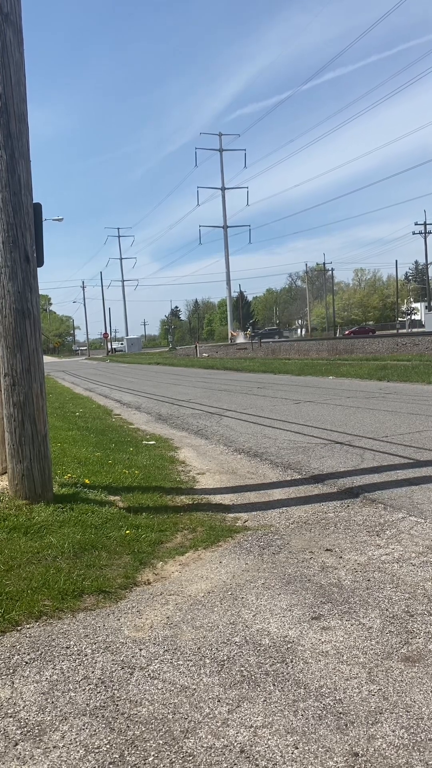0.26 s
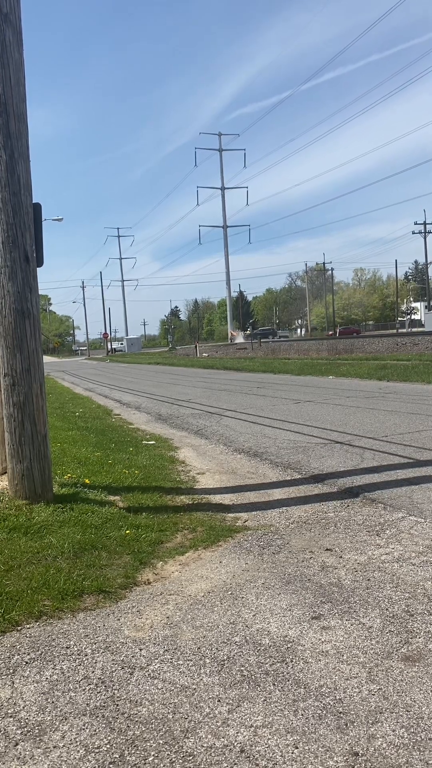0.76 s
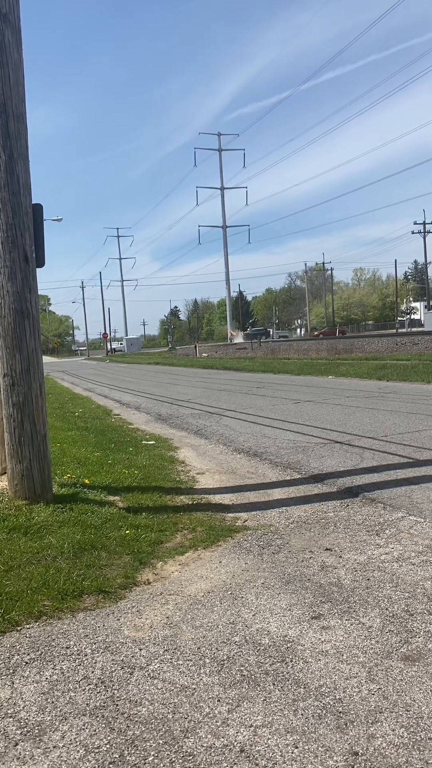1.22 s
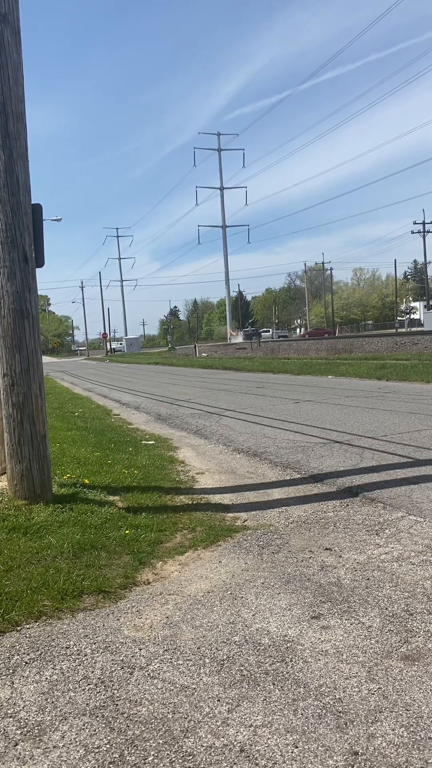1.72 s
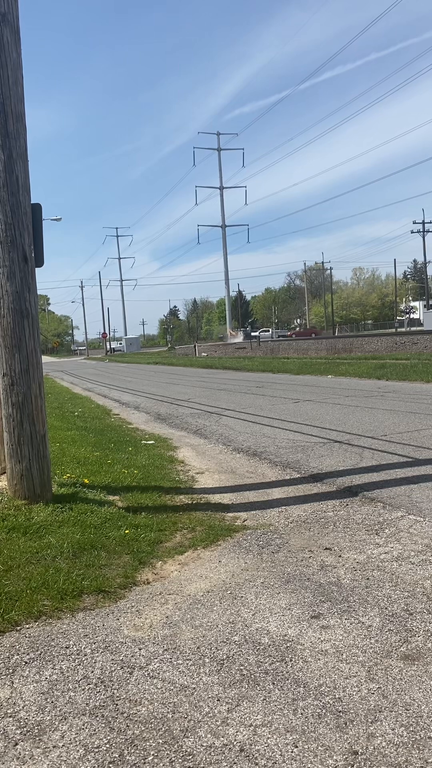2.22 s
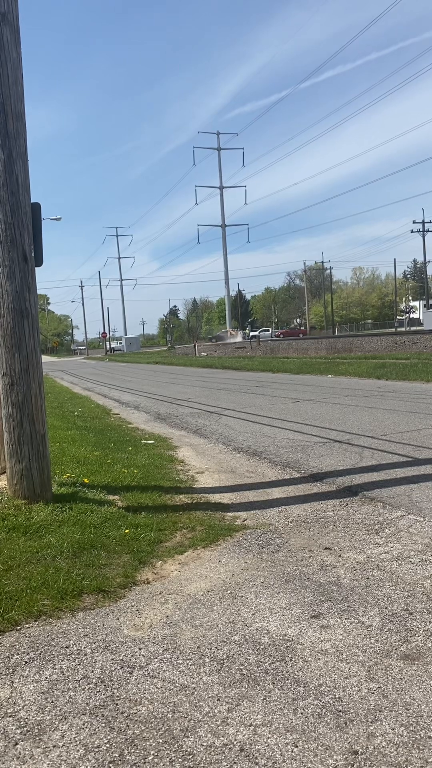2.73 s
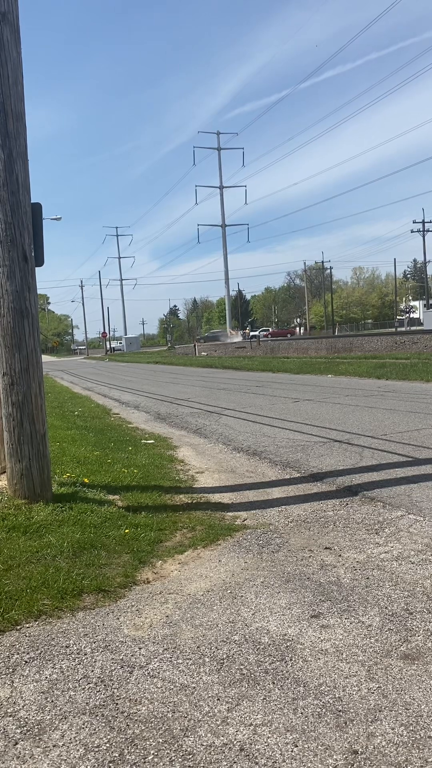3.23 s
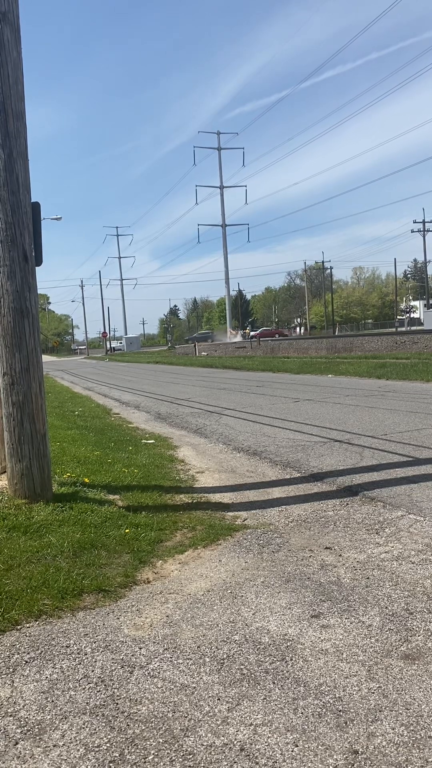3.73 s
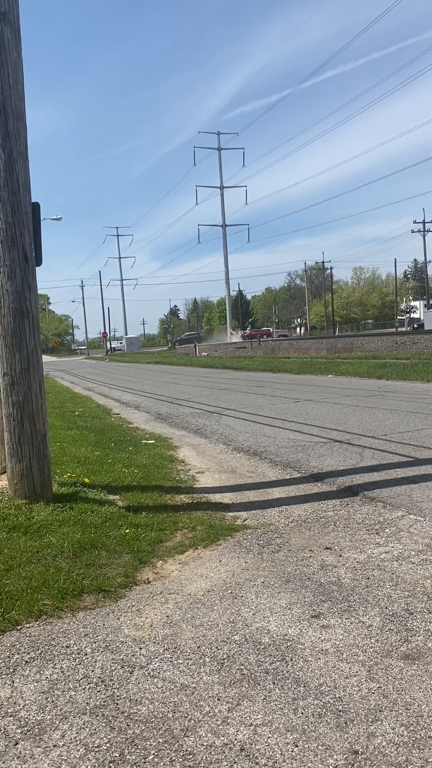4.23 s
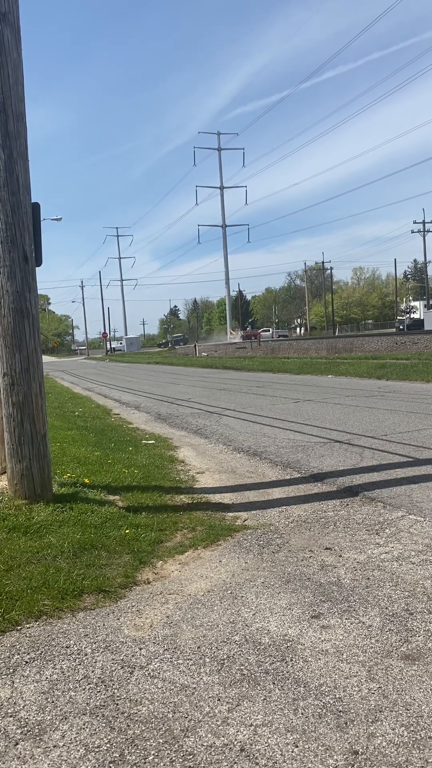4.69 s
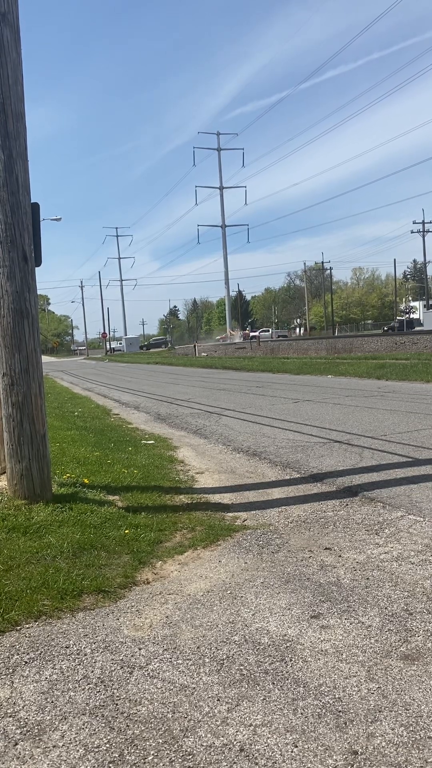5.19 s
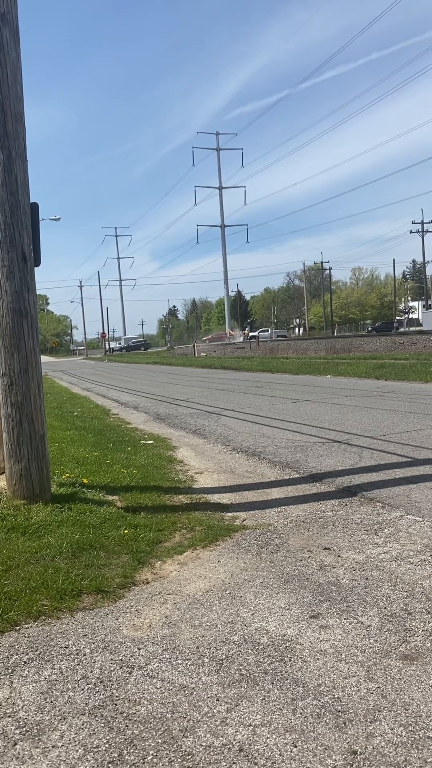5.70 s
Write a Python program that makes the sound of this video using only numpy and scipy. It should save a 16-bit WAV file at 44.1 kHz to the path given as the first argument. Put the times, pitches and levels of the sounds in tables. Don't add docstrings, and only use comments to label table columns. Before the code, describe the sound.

Across a wide open road, a heavy rail machine drones in the mid-lows while stones scrape, tumble and ring its steel plates in uneven beats. Around four seconds it dies down to a soft idling engine and distant traffic, a faint whine rises, then the work abruptly restarts. Light wind rumbles and slaps at a handheld stereo phone throughout.

```python
import sys
import numpy as np
from scipy import signal
from scipy.fft import rfft, irfft
from scipy.io import wavfile
from scipy.ndimage import uniform_filter1d

SR = 44100
rng = np.random.default_rng(int(sys.argv[2]) if len(sys.argv) > 2 else 0)


def gain_from_db(level_db):
    decades = np.asarray(level_db, float) / 20
    return 10 ** decades


def store_wav(level_fs):
    pcm = np.round(np.clip(np.atleast_2d(level_fs), -1, 1) * 32767)
    wavfile.write(sys.argv[1], SR, pcm.T.astype(np.int16))


N = 262395
T, HZ = np.arange(N) / SR, np.arange(N // 2 + 1) * SR / N

# pitch in Hz, width in Hz, level in dB.
DRONE_BANDS = [(344, 10.4, 5), (315.7, 22.6, -5), (450.2, 38, -12), (405, 17, -11.5), (257, 39, -11)]
# pitch in Hz, width in Hz, level in dB.
FRAME_BANDS = [(637.2, 37, 3.5), (947, 22.6, 1), (1053, 81, -2), (1311, 48, -3), (1196, 53, -3),
               (760, 340, -6), (1492, 104, -6.5), (540, 89, -8.5)]
# pitch in Hz, width in Hz, level in dB.
PLATE_BANDS = [(1685, 46, -4), (1839, 55, -2), (2119, 31, -0.5), (2017, 140, -4), (2272, 103, -3),
               (2407, 112, -3), (2656, 92, -13)]
# pitch in Hz, width in Hz, level in dB.
LOOSE_BANDS = [(3130, 70, -9), (3780, 33, -15), (4300, 46, -9.5), (4650, 65, -8.5), (4720, 50, -19)]
# pitch in Hz, width in Hz, level in dB.
IDLE_BANDS = [(179, 19.5, 5), (153, 8.6, -10), (241, 31, -19), (300, 17, -28), (495, 47, -14.5),
              (5800, 350, -36.5)]
# frequency in Hz, strength in dB per Hz.
STONE_COLOUR = [(2300, -20), (2850, -1), (3200, 1), (3700, -2.5), (4350, -4), (4850, 0), (5350, -8),
                (5900, -8.5), (6500, -10.5), (7500, -6), (8500, -21.5), (9500, -30), (11500, -31.5),
                (12800, -44), (13800, -51.5), (14800, -69)]
# frequency in Hz, strength in dB per Hz.
TRAFFIC_COLOUR = [(200, -35.5), (320, -6), (500, -15), (650, -11.5), (1000, -15.5), (2300, -19),
                  (2900, -27), (5800, -35), (6500, -49), (8000, -48), (9000, -62), (12000, -66.5),
                  (13500, -71), (14500, -90)]
# frequency in Hz, strength in dB per Hz.
SPILL_COLOUR = [(2000, -24.5), (4000, 3), (6500, 5), (7700, 13), (9000, -10.5), (11500, -15.5),
                (13500, -26), (15500, -36.5)]
# frequency in Hz, strength in dB per Hz.
DEEP_COLOUR = [(15, -39.5), (30, -19.5), (45, -5.5), (60, 1.5), (95, 2), (125, -17), (200, -55.5)]
# frequency in Hz, strength in dB per Hz.
FLUTTER_COLOUR = [(60, -39), (100, -12.5), (135, 2.5), (170, -9), (250, -9.5), (300, -15.5), (450, -48)]
# frequency in Hz, strength in dB per Hz.
CROSS_LOW_COLOUR = [(15, -37.5), (35, -16.5), (70, -3.5), (140, 2.5), (250, -4.5), (350, -20), (600, -41)]
# frequency in Hz, strength in dB per Hz.
CROSS_RASP_COLOUR = [(150, -34.5), (280, 4.5), (400, -0.5), (700, -11), (1000, -19), (1400, -30),
                     (2000, -54)]
# frequency in Hz, left lead in radians, left minus right in dB,
# share from all round in dB.
PORT_DIFFERENCE = [(300, -.1, -.6, -20), (800, -.12, -.5, -20), (1250, -.05, 0, -29), (1900, 0, .2, -34),
                   (2200, .1, 3.5, -10), (2600, -.3, 3, -6), (2950, -1.4, -1, -3), (3400, -1.6, -7, -1),
                   (4050, .6, -7, 0), (4800, -2, -3, -4), (5350, 0, 0, -20), (5800, 1, 0, -8),
                   (6300, 2.1, 0, -12), (6950, 3.05, 0, -24), (7950, 3.25, 0, -21), (8800, 4.7, 0, -10),
                   (9500, 6.25, 0, -24), (11200, 6.3, 0, -26), (11900, 7.2, 0, -12), (12500, 9.3, 0, -22),
                   (15000, 9.5, 0, -20)]
# start in seconds, peak in dB, pitch in Hz, left minus right in dB.
SLAPS = [(1.126, -8.5, 145, 5), (1.3005, -8.5, 97, 4), (1.54, -16, 89, 2), (1.528, -10.5, 226, 0),
         (1.616, -27, 160, -6), (2.57, -12, 230, -2), (0.56, -17, 260, 0), (2.366, -10.5, 200, -1),
         (1.348, -15, 140, 3), (1.405, -24, 110, 2), (3.4, -23, 130, -0.5), (4.463, -30, 63, 25),
         (5.3, -17, 63, -4)]
# start in seconds, peak
# in dB, pitch in Hz, ring time (60 dB) in seconds.
KNOCKS = [(.36, -32, 1340, 0.1), (1.628, -18.5, 278, .09), (1.675, -24, 231, .12), (1.74, -26, 201, 0.11),
          (2.2763, -19, 290.4, .06), (2.3015, -19, 290.6, 0.051), (2.33, -16, 340, 0.037),
          (2.3462, -15, 300, 0.045), (2.359, -12, 488.6, 0.024), (2.363, -26, 760, 0.061),
          (2.799, -32, 1256, 0.29), (3.09, -27, 1242, 0.15), (3.421, -28, 1081, 0.13),
          (3.869, -30, 626.5, 0.19), (5.422, -24, 1047, 0.098)]
# start in seconds, peak in dB, pitch in Hz, ring time (60 dB) in seconds.
TICK = (2.629, -27, 4400, .018)
# start in seconds, peak in dB.
SPILLS = [(0.377, -59), (1.031, -59.5), (1.189, -58), (1.3843, -60), (.52, -58.5), (1.7774, -70),
          (2.04, -62), (2.215, -63), (2.3776, -50.5), (2.5287, -68), (3.474, -54), (5.3936, -68.5),
          (5.7379, -64), (2.9777, -53), (3.144, -50), (3.307, -54), (3.3882, -48), (3.711, -56.5),
          (4.4702, -72), (5.4968, -60.5), (5.662, -55)]
# middle in seconds, length in seconds,
# depth from 0 to 1, low edge in Hz, high edge in Hz.
GUARD_DIPS = [(1.089, 0.024, 0.79, 250, 700), (2.412, 0.026, 0.69, 60, 700), (1.173, .02, 0.8, 170, 260),
              (1.27, .07, 0.53, 480, 620), (2.51, 0.016, 1, 414, 1120), (3.97, 0.0081, 0.5, 250, 600),
              (4.386, 0.031, 0.65, 230, 604), (4.45, 0.0086, 1, 101, 900), (4.605, 0.018, 0.44, 230, 600),
              (5.003, 0.031, 0.85, 60.3, 706), (5.106, 0.0091, 0.3, 60, 300)]
# time in seconds, level on the plates in dB.
FEED = [(0, -43), (.45, -41), (1.1, -44.5), (1.55, -46), (2.3, -47.5), (2.55, -46.5), (2.75, -39),
        (3.1, -37), (3.6, -37), (3.76, -45.5), (3.9, -48), (5.15, -36.5), (5.3, -40), (5.5, -38),
        (5.62, -41.5), (5.75, -40), (5.95, -40)]
# middle in seconds, length in seconds, depth
# in dB.
STALLS = [
    (0.472, 0.041, -12),
    (1.12, 0.039, -7.5),
    (2.454, 0.084, -19),
    (3.8, 0.087, -9.5),
    (3.984, 0.045, -11),
]
# peak in seconds, level in dB, length in seconds.
SCRAPES = [(0.057, -33.5, 0.042), (0.21, -41, 0.06), (0.384, -34, 0.072), (0.712, -36.5, 0.021),
           (1.393, -42, 0.13), (2.408, -42, 0.098), (2.898, -31, 0.011), (3.023, -42.5, 0.02),
           (3.149, -37, 0.027), (3.433, -35.5, 0.06), (3.581, -34.5, 0.064), (3.891, -40.5, 0.072),
           (5.293, -34.5, 0.1), (5.438, -36, 0.04), (5.786, -37, 0.07), (5.946, -34.5, 0.035)]
# peak in seconds, level in dB, length in seconds.
THROBS = [(0.08, -47.5, 0.031), (0.174, -27.5, 0.065), (0.608, -31, 0.093), (0.73, -32.5, 0.07),
          (0.875, -34, 0.16), (1.077, -21.5, 0.03), (1.2, -36, 0.064), (1.305, -30.5, 0.031),
          (1.416, -34, 0.073), (1.692, -32, 0.032), (1.8, -32, 0.034), (2.013, -29.5, 0.13),
          (2.295, -35, 0.24), (2.559, -30.0, 0.08), (2.706, -26, 0.048), (2.845, -28.5, 0.045),
          (2.921, -28, 0.014), (3.095, -34, 0.085), (3.236, -28, 0.067), (3.42, -32, 0.17),
          (3.662, -29.5, 0.056), (4.045, -39, 0.05), (5.168, -31.5, 0.057), (5.274, -28.5, 0.11),
          (5.52, -27.5, 0.035), (5.758, -27.5, 0.082), (5.85, -29, 0.055)]
# time in seconds, strength in dB, part across the ports in dB.
WIND = [(0, -38, -48), (.7, -33, -50), (1, -30.5, -42), (1.4, -38.5, -35.5), (1.9, -45.5, -40),
        (2.4, -48, -35), (2.75, -51, -41), (3.4, -41, -43.5), (3.65, -39, -52), (4.2, -42.5, -46.5),
        (4.7, -46, -49), (5.05, -37, -48.5), (5.3, -37.5, -56), (5.6, -42.5, -51), (5.95, -31, -46)]
# peak in seconds, level in dB, length in seconds.
THUDS = [(0.0, -22.5, 0.053), (0.539, -27, 0.047), (0.668, -31, 0.039), (0.994, -20.5, 0.19),
         (1.315, -35, 0.033), (1.41, -24, 0.023), (1.54, -26.5, 0.045), (1.666, -33.5, 0.065),
         (2.006, -36.5, 0.11), (2.16, -34.5, 0.059), (2.367, -33.5, 0.12), (2.62, -39, 0.069),
         (3.213, -40, 0.11), (3.871, -49, 0.049), (4.385, -33, 0.18), (4.48, -29.5, 0.032),
         (4.597, -32.5, 0.089), (4.826, -30.5, 0.14), (4.99, -24, 0.072), (5.203, -25.5, 0.048),
         (5.572, -24.5, 0.095), (5.732, -31, 0.045)]
# peak in seconds, level in dB, length in seconds.
FLAPS = [(0.145, -28.5, 0.26), (0.289, -25.5, 0.076), (0.589, -25.5, 0.05), (0.964, -18, 0.087),
         (1.053, -17, 0.053), (1.127, -35, 0.014), (1.307, -28, 0.1), (1.532, -38, 0.03),
         (1.636, -25, 0.032), (1.756, -32, 0.054), (1.976, -38.5, 0.066), (2.36, -26, 0.13),
         (2.908, -38, 0.078), (3.033, -31, 0.099), (3.153, -28, 0.092), (3.278, -25, 0.11),
         (3.457, -18, 0.017), (3.881, -33, 0.19), (5.183, -23.5, 0.033), (5.318, -27, 0.044),
         (5.393, -27, 0.065), (5.592, -28, 0.14), (5.687, -26, 0.082), (5.802, -22, 0.057),
         (2.27, -30.5, 0.13)]
# peak in seconds, level in dB, length in seconds.
EDDIES = [(0.304, -35, 0.041), (0.454, -35, 0.055), (0.659, -29.5, 0.039), (0.928, -24, 0.055),
          (1.063, -24.5, 0.17), (1.262, -25, 0.048), (1.551, -28, 0.1), (1.901, -34, 0.09),
          (2.18, -37, 0.11), (2.36, -33.5, 0.065), (3.118, -32.5, 0.098), (3.322, -36, 0.14),
          (3.682, -35, 0.058), (3.976, -34.5, 0.2), (4.425, -35, 0.064), (4.819, -43, 0.052),
          (5.188, -31, 0.19), (5.478, -35, 0.047), (5.642, -32, 0.062), (5.932, -32, 0.23)]
# start in seconds, peak in dB.
SNAPS = [
    (2.6313, -54.5),
    (4.7132, -68),
]
# peak in seconds, length in seconds, level in dB, first pitch in Hz, last pitch in Hz.
RUN_DOWN = (4, 0.13, -32.5, 255.5, 225)
# peak in seconds, length in seconds, level in dB, pitch in Hz, width in Hz.
GROWL = (3.5, 0.11, -30.5, 218, 49.5)

TRAFFIC_DB, IDLE_DB = -48.5, -43.5
SPILL_S, BEAT_HZ, ECHO_S = 0.043, 12.5, 0.1
FRESH_DB = 1.5
STOP_S, START_S, FADE_S, SPIN_UP_S, REST_DB = 3.94, 5.085, 0.13, 0.041, -22
FRAME_DB, FRAME_SHARE = -40, 0.53
STONES_DB, STONES_SHARE = -52, 0.58
DRONE_DB, DRONE_SHARE = -34.5, 0.21


def unit(x):
    return x / np.sqrt(np.mean(x ** 2))


def curves(table):
    s, *columns = np.transpose(table)
    return [np.interp(T, s, c) for c in columns]


def across(table, column=1):
    rows = np.array(table)
    return np.interp(np.log(HZ + 1), np.log(rows[:, 0]), rows[:, column])


def colour(table):
    return gain_from_db(across(table)) * (HZ > table[0][0]) * (HZ < table[-1][0])


def ring(bands):
    power = 0
    for hz, width, db in bands:
        off_pitch = (HZ ** 2 - hz ** 2) / ((HZ + 1) * 1.69 * width)
        power = power + (gain_from_db(db) / (1 + off_pitch ** 2)) ** 2
    return np.sqrt(power)


def through(x, response):
    return irfft(rfft(x) * response, N)


def noise():
    return rng.standard_normal(N)


def walk(rate):
    hold = int(SR / rate)
    steps = np.repeat(rng.standard_normal(N // hold + 1), hold)
    return unit(uniform_filter1d(uniform_filter1d(steps, hold), hold)[:N])


def layer(response, db, flicker_db, rate, drive=1, even=0.):
    x = through(noise() * drive * gain_from_db(flicker_db * walk(rate)), response)
    local_power = uniform_filter1d(x ** 2, size=SR // 20)
    return gain_from_db(db) * unit(x / local_power ** (even / 2))


def burst(s, rise, fall):
    out = np.zeros(N)
    near = slice(int(s * SR) + 1, int((s + 12 * fall) * SR))
    since = T[near] - s
    out[near] = (1 - np.exp(-since / rise)) * np.exp(-since / fall)
    return out


def swell(rest_db, events, trim_db=0.):
    slow = T[::100]
    bells = 0
    for s, db, length in events:
        bells = bells + gain_from_db(2 * (db + trim_db)) * np.exp(-((slow - s) / (0.4 * length)) ** 2)
    return 10 * np.log10(gain_from_db(2 * rest_db) + np.interp(T, slow, bells))


def pings(bands, count):
    out = 0
    for hz, width, db in bands:
        blows = np.zeros(N)
        blows[rng.integers(N, size=count)] = gain_from_db(2.0 * rng.exponential(size=count))
        pole = np.exp((2j * np.pi * hz - np.pi * 0.6 * width) / SR)
        out = out + gain_from_db(db) * unit(signal.lfilter([1], [1, -pole], blows).imag)
    return out


def running():
    fall = 1 - np.exp(-np.clip(T - STOP_S, 0, None) / FADE_S)
    return REST_DB * fall * np.exp(-np.clip(T - START_S, 0, None) / SPIN_UP_S)


def load():
    return swell(curves(FEED)[0], SCRAPES, trim_db=-2.0)


def idle_whine():
    rise = np.exp(-((T - 4.86) / 0.22) ** 2 + 0.2 * walk(12))
    return gain_from_db(-50.5) * rise * np.sin(2 * np.pi * 404 * T + 0.5 * walk(11))


def town():
    traffic = layer(colour(TRAFFIC_COLOUR), TRAFFIC_DB, 1.8, 6)
    idle_db = swell(IDLE_DB, [(4.42, -40, 0.42)])
    idle = layer(ring(IDLE_BANDS), idle_db, 0.67, 3.2, even=0.75)
    return traffic + idle + idle_whine()


def slaps():
    out = np.zeros((2, N))
    for s, db, hz, pan_db in SLAPS:
        slap = burst(s, 0.2 / hz, 0.59 / hz) * np.sin(2 * np.pi * hz * (s - T))
        sides_db = db - 4.5 + np.array([pan_db, -pan_db]) / 2
        out = out + np.outer(gain_from_db(sides_db), slap / np.abs(slap).max())
    return out


def wind():
    wind_db, across_db = curves(WIND)
    deep_db = swell(wind_db, THUDS, trim_db=-1.7)
    shake = gain_from_db(2.02 * (load() + running()) - 2.5)
    flutter_db = swell(10 * np.log10(gain_from_db(1.77 * wind_db - 7.0) + shake), FLAPS, trim_db=-1.5)
    cross_db = swell(0.24 * across_db - 28.0, EDDIES, trim_db=-1.3)
    rasp_db = swell(across_db, EDDIES, trim_db=-11.0)
    both = layer(colour(DEEP_COLOUR), deep_db, 1.5, 15, even=0.6)
    both = both + layer(colour(FLUTTER_COLOUR), flutter_db - 0.6, 1.9, 6.3, even=0.57)
    eddy = gain_from_db(1.6 * walk(14))
    apart = layer(colour(CROSS_LOW_COLOUR), cross_db, 1.5, 20, eddy)
    apart = apart + layer(colour(CROSS_RASP_COLOUR), rasp_db + 0.5, 1.8, 18, eddy)
    return both + np.outer([1, -1], apart) + slaps()


def chirp():
    squeak = unit(through(noise(), ring([(7360, 500, 0)])))
    return gain_from_db(-58.5) * squeak * np.exp(-((T - 3.32) / 0.014) ** 2)


def snaps():
    hiss = uniform_filter1d(np.diff(rng.standard_normal((3, N)), prepend=0), size=3)
    shape = sum(gain_from_db(db) * burst(s, 0.0002, 0.0015) for s, db in SNAPS)
    return (hiss[0] + 0.6 * hiss[1:]) * shape


def growl():
    s, length, db, hz, width = GROWL
    sound = layer(ring([(hz, width, 0)]), db, 1.7, 13, even=0.72)
    return sound * np.exp(-((T - s) / length) ** 2)


def run_down():
    s, length, db, from_hz, to_hz = RUN_DOWN
    hz = to_hz + (from_hz - to_hz) / (1 + np.exp((T - s) / (length / 2)))
    rough = unit(uniform_filter1d(uniform_filter1d(noise(), size=300), size=300))
    shape = np.exp(-((T - s) / length) ** 2) * (0.83 + 0.84 * rough)
    return gain_from_db(db) * shape * np.sin(2 * np.pi * np.cumsum(hz) / SR)


def spills():
    bright = unit(through(noise(), colour(SPILL_COLOUR)))
    return bright * sum(gain_from_db(db + 9.0) * burst(s, 0.00059, SPILL_S) for s, db in SPILLS)


def knocks():
    out = 0
    for s, db, hz, t60 in KNOCKS + [TICK]:
        out = out + gain_from_db(db) * burst(s, 0.0017, t60 / np.log(1000)) * np.sin(2 * np.pi * hz * T)
    return out


def drone(more, rest_db):
    stall_db = sum(db * np.exp(-((T - s) / length) ** 2) for s, length, db in STALLS)
    steady_db = DRONE_DB + DRONE_SHARE * more + stall_db + 1.46 * rest_db
    drone_db = swell(steady_db, THROBS, trim_db=-0.13)
    return layer(ring(DRONE_BANDS), drone_db, 0.43, 6.4, even=0.61)


def scraping_beat():
    beat_hz = BEAT_HZ * (1 + 0.1083 * walk(3.05))
    return gain_from_db(1.34 * np.sin(2 * np.pi * np.cumsum(beat_hz) / SR) + 1.1 * walk(9))


def machine():
    load_db, rest_db = load(), running()
    plates_db = load_db + rest_db
    more = load_db + 42
    fresh_db = FRESH_DB * (T > START_S)
    frame_db = FRAME_DB + FRAME_SHARE * more + 0.89 * rest_db - 0.6 * fresh_db
    stones_db = STONES_DB + STONES_SHARE * more + 0.85 * rest_db + fresh_db
    beat = scraping_beat()
    plates = layer(ring(PLATE_BANDS), plates_db, 0.6, 14, beat)
    frame = layer(ring(FRAME_BANDS), frame_db, 0.41, 12, beat)
    stones = layer(colour(STONE_COLOUR), stones_db, 1.0, 22, beat)
    struck_steel = gain_from_db(plates_db - 13.0) * pings(FRAME_BANDS[:4] + PLATE_BANDS, count=70)
    struck_loose = gain_from_db(stones_db - 4.5) * pings(LOOSE_BANDS, count=200)
    boom = layer(ring([(135, 35, 0)]), 0.72 * plates_db - 13.0, 2.0, 14, even=1.0)
    work = plates + frame + stones + struck_steel + struck_loose
    return work + boom + spills() + knocks() + drone(more, rest_db)


def ports(x):
    turn = gain_from_db(across(PORT_DIFFERENCE, column=2) / 2) * np.exp(0.5j * across(PORT_DIFFERENCE))
    tail = np.exp(-np.arange(SR // 2) / (ECHO_S * SR))
    smear = rfft(rng.standard_normal((2, SR // 2)) * tail, N) / np.sqrt(np.sum(tail ** 2))
    share = gain_from_db(across(PORT_DIFFERENCE, column=3))
    return irfft(rfft(x) * (np.array([turn, 1 / turn]) + share * smear), N)


def guard(x):
    mid, cut = x.mean(axis=0), np.zeros(N)
    for s, length, depth, low_hz, high_hz in GUARD_DIPS:
        near = slice(int((s - 0.2) * SR), int((s + 0.2) * SR))
        sos = signal.butter(2, [low_hz, high_hz], "band", fs=SR, output="sos")
        band = signal.sosfiltfilt(sos, mid[near])
        cut[near] += min(depth, 1) * np.exp(-((T[near] - s) / length) ** 4) * band
    return x - cut


def scene():
    return ports(machine() + town()) + wind() + chirp() + run_down() + growl() + snaps()


def roll_off(x):
    return signal.sosfilt(signal.butter(12, 14600, fs=SR, output="sos"), x)


def record(dry):
    mix = guard(dry) * np.clip(T / 0.004, 0, 1)
    return roll_off(mix)


dry = scene()
out = record(dry)
store_wav(out)
```